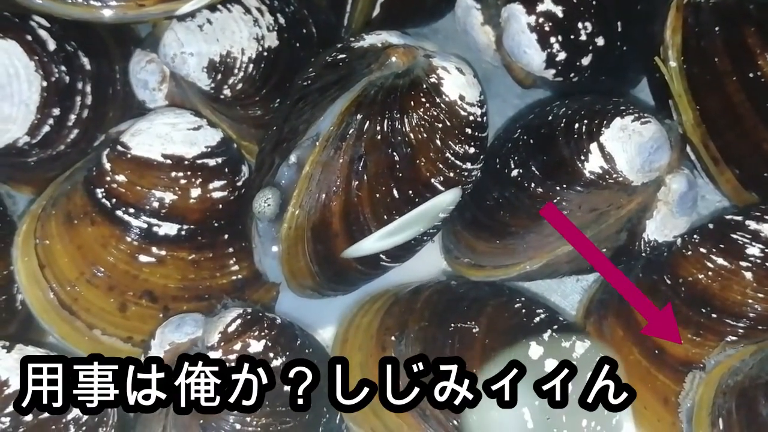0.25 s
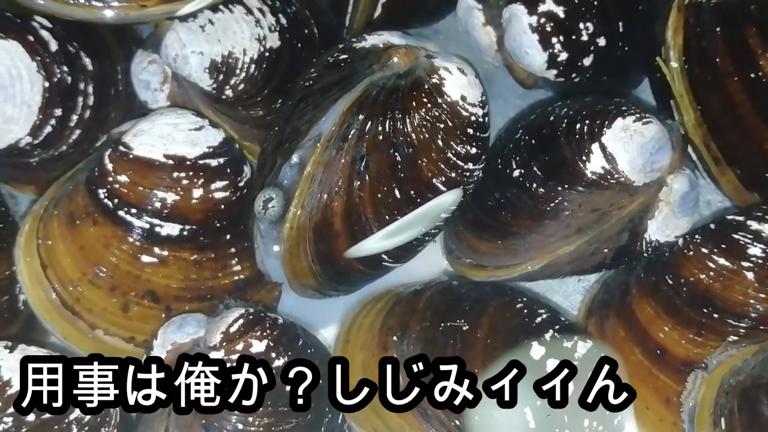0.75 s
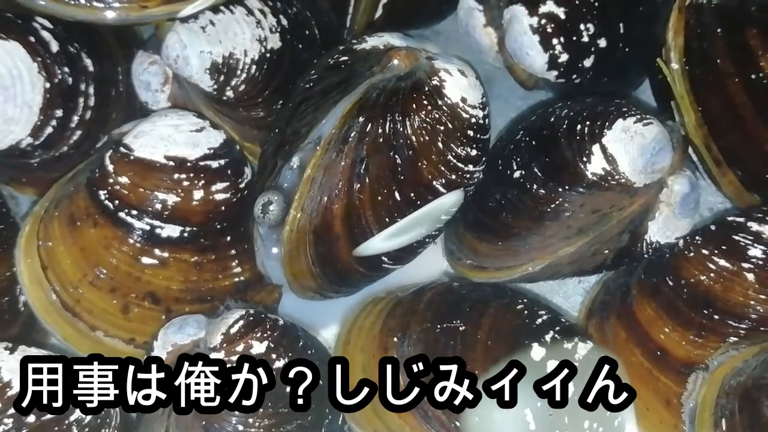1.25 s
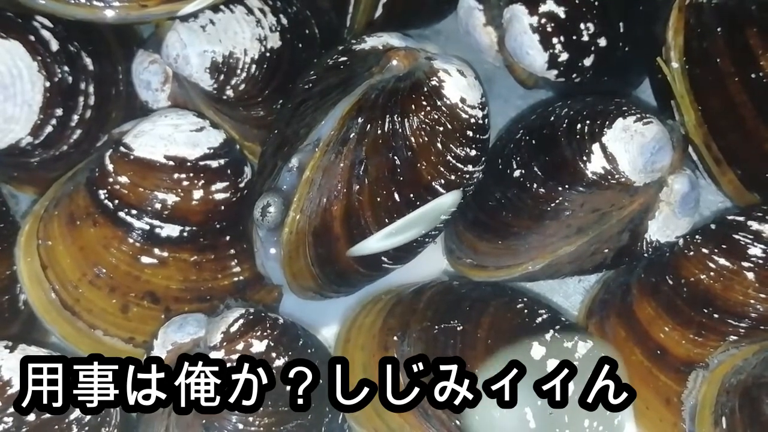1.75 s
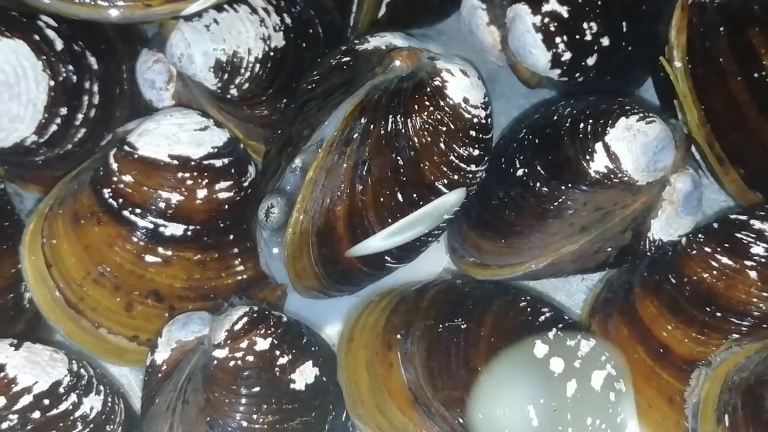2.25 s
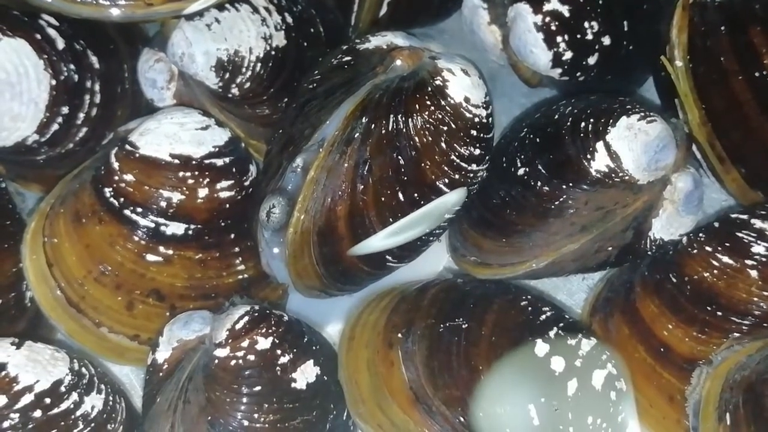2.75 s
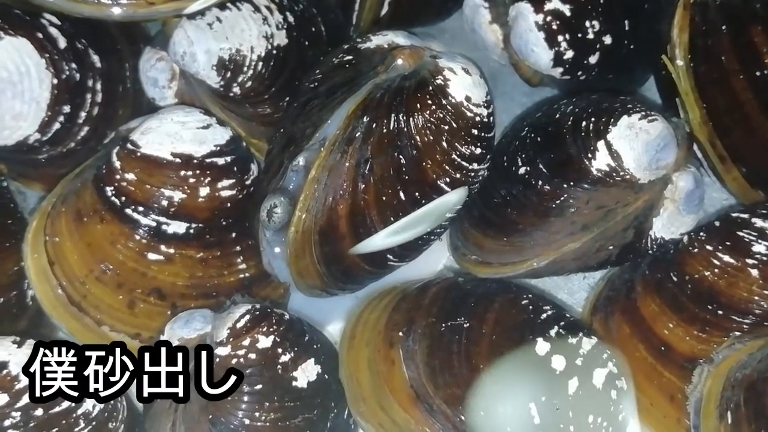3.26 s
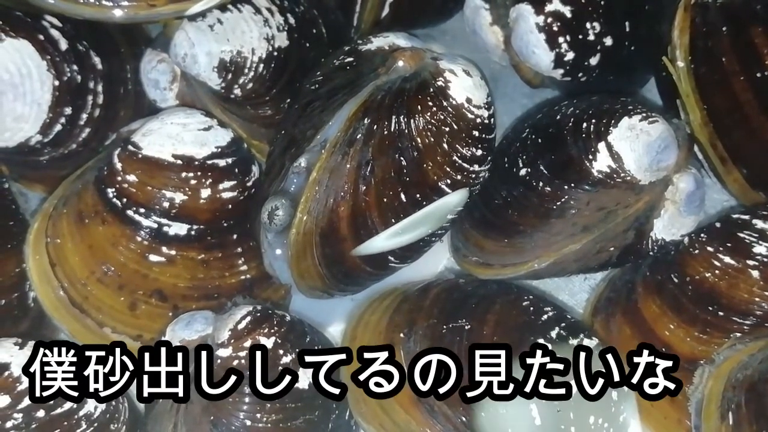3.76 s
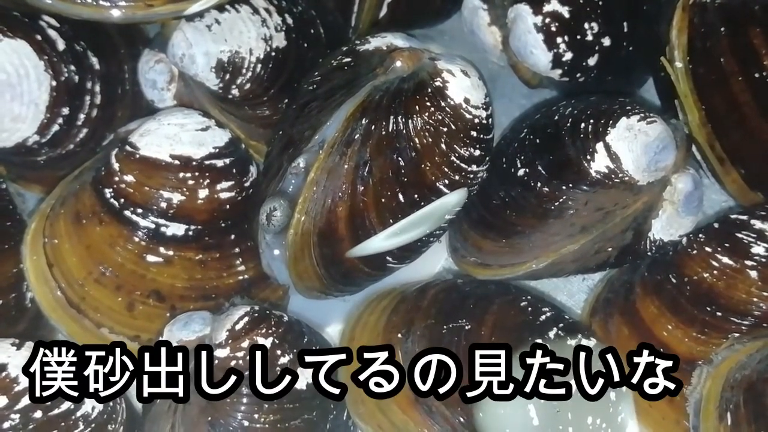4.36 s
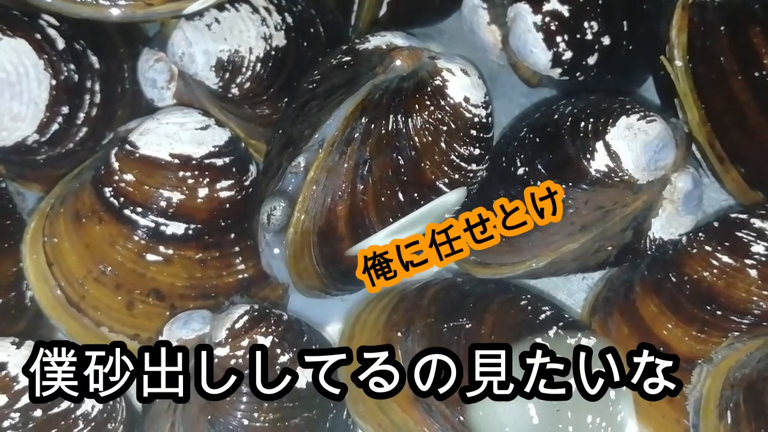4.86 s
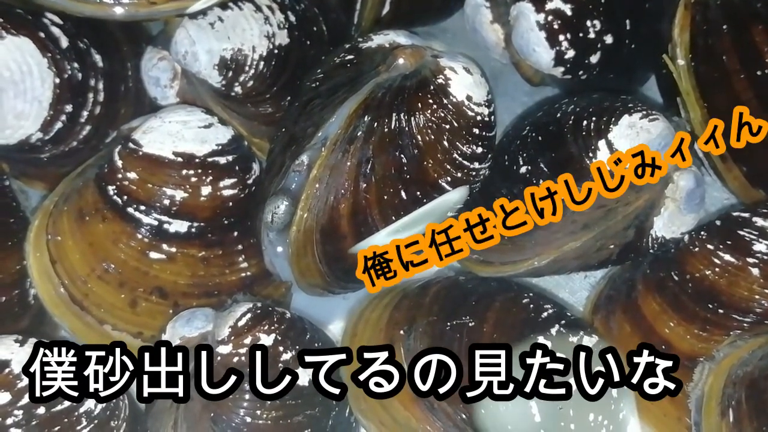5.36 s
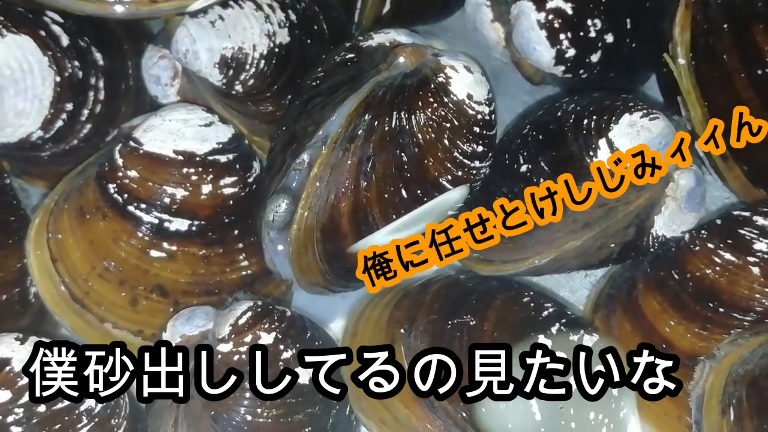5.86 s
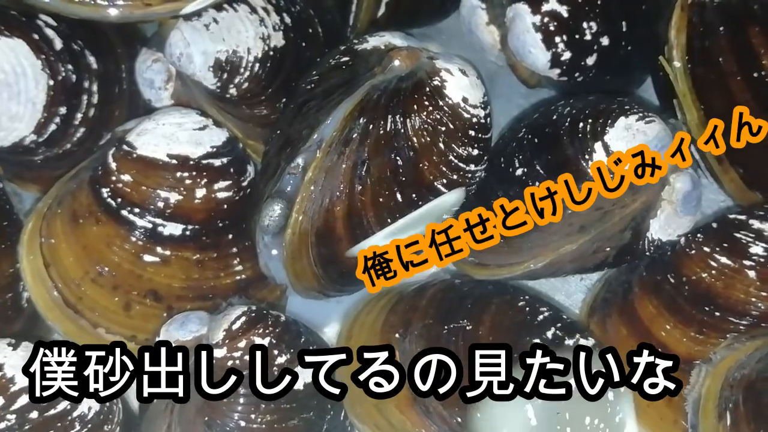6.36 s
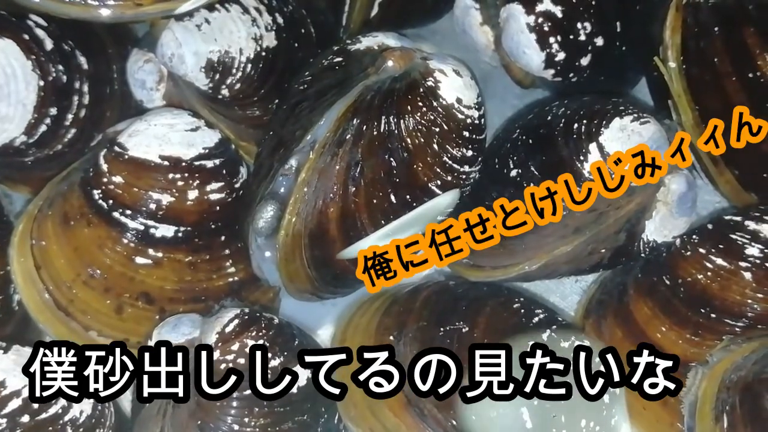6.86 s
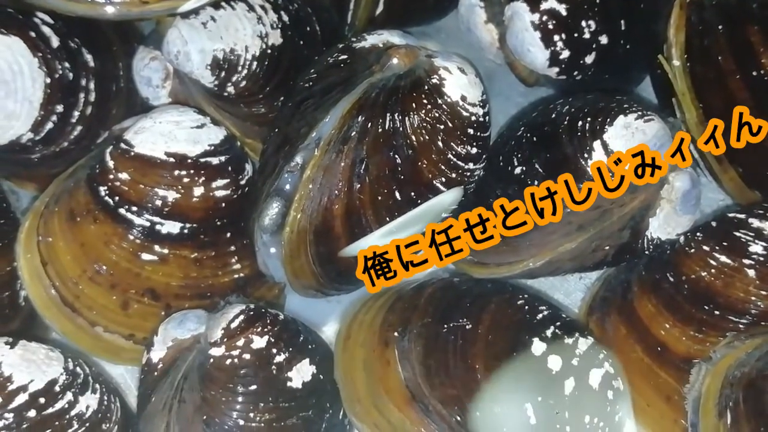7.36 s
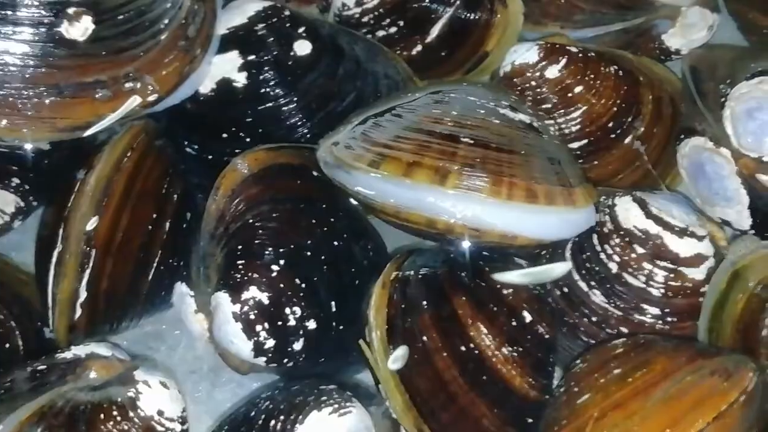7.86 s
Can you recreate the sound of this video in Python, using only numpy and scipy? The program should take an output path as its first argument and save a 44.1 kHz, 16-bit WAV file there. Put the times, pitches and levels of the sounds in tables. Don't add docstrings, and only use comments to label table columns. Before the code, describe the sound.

A small quiet room with a faint, steady low hum and soft far air; clams in a shallow tray of water are very close, in wide stereo, the brightest spray leaning right. The first 0.7 seconds are nearly still. From 0.7 to 1.6 come small clicks and brief fizzy dribbles. Between 1.7 and 2.7 ticks, bubbly blips and plops crowd together, with one hard, bright snap at 2.44 followed by a wet spurt. Isolated clicks and soft plops follow at 2.8, 3.15, 3.35, 3.6, 3.8 and 3.95, then a lull. A rounded, hollow plop lands at 4.75. From 5.0 to 6.1 a dense cluster bursts out: sharp snaps at 5.5 and 5.85, low gulps, squeaky narrow hisses, gurgling squirts. It thins to light dribbling and ticks, then swells at 7.3 to 7.5 into a bright, fizzing squirt with plops. After that, mostly hum and a faint low gulp around 8.1.

```python
import sys
import numpy as np
from scipy import signal
from scipy.fft import rfft, irfft, next_fast_len
from scipy.io import wavfile
from scipy.ndimage import uniform_filter1d, map_coordinates

SR = 44100
rng = np.random.default_rng(int(sys.argv[2]) if len(sys.argv) > 2 else 0)


def voltage_ratio(level):
    return 10 ** (np.asarray(level, float) / 20)


def transcribe(u):
    v = np.clip(np.atleast_2d(u).T, -1, 1)
    q = np.round(v * 32767).astype(np.int16)
    wavfile.write(sys.argv[1], SR, q)


N = 358136

# pitch_hz, left_minus_right_db
SIDE_LEVELS = [(250, 0), (800, -6), (1200, 2.5), (1900, 3), (2600, -1), (3300, -4.5), (5000, -6),
               (7300, -11.5), (8800, 2), (11500, -6.5), (14000, -8), (15700, -15)]
# low_hz, high_hz, scatter_t60_s, rise_s, room_t60_s, share common to both sides [0-1]
PARTS = [
    (4300, 10000, .016, .0001, .24, .3),
    (1400, 4500, .016, .0002, .27, .4),
    (10000, 19000, .014, .0001, .17, .3),
    (170, 1600, .045, .002, .3, .8),
]
LAG = 11
SPACING = 28
GULP_SPACING = 19
GULP_HZ = 800
EDGE = 1.83


def unit(x):
    return x / np.sqrt(np.mean(x ** 2) + 1e-20)


def along(points, hz):
    f, v = np.transpose(points)
    return np.interp(np.log(hz + 1), np.log(f + 1), v)


def filtered(x, response):
    m = next_fast_len(x.shape[-1] + 4096)
    spectrum = rfft(x, m) * response(np.fft.rfftfreq(m, 1 / SR))
    return irfft(spectrum, m)[..., :x.shape[-1]]


def resonance(f, hz, width_hz):
    damping = 1j * f * width_hz
    return damping / (hz * hz - f * f + damping)


def band(x, low_hz, high_hz):
    sos = signal.butter(N=3, Wn=[low_hz, high_hz], btype="band", fs=SR, output="sos")
    return signal.sosfilt(sos, x)


def patches(rate):
    knots = rng.standard_normal(int(N * rate / SR) + 4)
    return map_coordinates(knots, [np.arange(N) * rate / SR])


def rush(spectrum):
    # pitch_hz, left_minus_right_db
    balance = [(60, -0.5), (600, 2.5), (1400, -4), (2400, -3), (4400, -5), (6900, -4), (8600, 1.5),
               (15000, 0)]
    # pitch_hz, left-right coherence [0-1]
    likeness = [(60, 1), (170, 1), (260, 0.97), (345, 0.96), (480, .15), (690, 0.36), (1000, 0.44),
                (1300, 1), (1640, 0.16), (2070, .1), (3100, 0.23), (6000, 0.056)]

    def mid_side(hz):
        turn = np.arccos(np.clip(along(likeness, hz), -1, 1)) / 2
        return voltage_ratio(along(spectrum, hz)) * [np.cos(turn), np.sin(turn)]

    mid, side = filtered(rng.standard_normal((2, N)), mid_side)
    pair = np.array([mid + side, mid - side])
    return unit(filtered(pair, lambda hz: voltage_ratio(np.outer([.5, -.5], along(balance, hz)))))


def house():
    # pitch_hz, level_db per Hz
    hum_spectrum = [(15, -60), (25, -13.5), (54, -2), (118, -13), (152, -2.5), (183, -9.5), (242, -8),
                    (271, -9.5), (299, -16.5), (500, -21.5), (650, -57), (1100, -120)]
    # pitch_hz, level_db per Hz
    air_spectrum = [(300, -25), (450, -3), (650, -8), (1000, -3), (1400, .5), (2000, -4.5), (3000, -4.5),
                    (4000, -13), (5700, -15), (8800, -14), (9800, -21.5), (11000, -26), (15600, -30)]
    # pitch_hz, width_hz, level_db
    modes = [
        (48, 18, -65.5),
        (149.7, 7.6, -65.5),
        (208, 5.8, -67),
        (242.2, 17.2, -63.5),
    ]
    # pitch_hz, lag_rad
    phase_lag = [(60, .1), (260, .5), (430, .7), (600, 3.1), (860, 2.8), (1030, 5.3), (1640, 5.8),
                 (2070, 8.5), (3100, 9.5)]
    settled = np.arange(N) > 7.85 * SR
    hum = voltage_ratio(-56.5 + 0.11 * patches(5.5)) * rush(hum_spectrum)
    air = hum + voltage_ratio(-59 - 1.2 * settled + 0.48 * patches(8.8)) * rush(air_spectrum)
    for hz, width_hz, db in modes:
        mode = filtered(rng.standard_normal(N), lambda f: resonance(f, hz, width_hz) ** 2)
        air = air + voltage_ratio(db) * unit(mode)
    return filtered(air, lambda hz: np.exp(1j * np.outer([-.5, .5], along(phase_lag, hz))))


def wavering(x):
    hz, _, z = signal.stft(x, SR, nperseg=512)
    field = rng.standard_normal(z.shape[1:])
    field = uniform_filter1d(field, size=5, axis=0)
    field = uniform_filter1d(field, size=16, axis=1)
    field = unit(field) * (hz[:, None] > 400)
    waver_db = 2 * field
    return signal.istft(z * voltage_ratio(waver_db), nperseg=512)[1][:, :N]


def water_colour():
    # pitch_hz, level_db per Hz
    water_spectrum = [(140, -14), (280, -1), (500, -5), (850, -1), (1400, -5), (2900, -.5), (4000, -4),
                      (5200, -4.5), (7400, 0), (9000, -3), (10200, -13), (12900, -19), (14600, -29),
                      (15800, -38)]
    hz = np.fft.rfftfreq(2048, 1 / SR)
    db = along(water_spectrum, hz) + np.outer([.5, -.5], along(SIDE_LEVELS, hz))
    cepstrum = irfft(np.log(np.maximum(voltage_ratio(db), 1e-4)))
    cepstrum[:, 1:len(hz) - 1] *= 2
    cepstrum[:, len(hz):] = 0
    return irfft(np.exp(rfft(cepstrum)))[:, :len(hz)]


def coloured(x, colour):
    kernel = colour.reshape((1,) * (x.ndim - 2) + (2, -1))
    return signal.oaconvolve(x, kernel, axes=-1)[..., :x.shape[-1]]


def paths(share, near_t60, rise, room_t60, spacing=SPACING):
    # time_s, level_db over the tail
    walls = [
        [(.0125, 0.5), (.03, 5.5)],
        [(.012, -1), (.023, 7)],
    ]
    echo_s, cliff = 0.00094, 1.83
    t = np.arange(SR // 3) / SR
    own, right = rng.standard_normal((2, len(t)))
    left = share * np.roll(right, spacing - LAG) + np.sqrt(1 - share ** 2) * own
    pair = np.array([left, right])
    near = np.sign(pair) * voltage_ratio(-15 * (4 * t / near_t60) ** cliff) * (1 - np.exp(-t / rise))
    room = pair * voltage_ratio(-60 * t / room_t60) * (1 - np.exp(-(t / 0.0063) ** 2))
    walls_db = [sum(db * np.exp(-((t - s) / echo_s) ** 2) for s, db in side) for side in walls]
    return np.array([near, room * voltage_ratio(np.array(walls_db))])[..., :SR // 6]


def add(out, s, sound, db, start, size):
    at = round(s * SR)
    gain = voltage_ratio(db) / np.sqrt(np.mean(sound[:, start:start + size] ** 2))
    out[0, at + LAG:][:sound.shape[1]] += gain * sound[0]
    out[1, at:][:sound.shape[1]] += gain * sound[1]


def swells():
    # middle_s, half_length_s, fizz_db, bubbles_db and gurgle_db re fizz
    jets = [(0.3, 0.41, -70, 4.5, -6), (0.92, 0.13, -52, -1.5, -4.5), (1.3, 0.026, -57.5, 1, 4),
            (2.7, 0.049, -54.5, -10, -8), (6.63, 0.22, -62.5, -6.5, -9), (3.3, .15, -79, 0, 2),
            (1.72, 0.12, -49, -2, -4.5), (1.87, 0.086, -48.5, -15, 2), (2.03, 0.055, -54, 1, -10),
            (2.9, 0.15, -60.5, 3, 4), (4.58, 0.044, -67, -4, -10), (5.17, 0.051, -55, -9, -14),
            (5.27, 0.091, -49, -3, 0), (5.72, 0.095, -50, -0.5, 3.5), (6.4, 0.079, -53, -15, -16),
            (6.84, 0.084, -53, -10, -7), (6.97, 0.13, -43, -6.5, -10.5), (7.24, 0.1, -44, -16, -11.5),
            (7.355, 0.096, -34.5, -9, -15), (7.425, 0.036, -37.5, -9.5, -10), (8.03, 0.018, -67, -16, 3)]
    # middle_s, half_length_s, fizz_db, bubbles_db and gurgle_db re fizz
    dribbles = [(0.2, 0.13, -77, -6, 3), (0.8, 0.044, -51.5, -9, -2), (1.1, 0.077, -44, -7, -11),
                (1.19, 0.03, -51, 0, 3.5), (1.4, 0.046, -57.5, -4.5, -9), (1.51, 0.081, -48, -2, -6.5),
                (2.19, 0.072, -62.5, 13, 15.5), (2.51, 0.045, -39, 0, -7), (2.62, 0.049, -56.5, 14, 6),
                (3.26, 0.075, -63.5, 10, 4), (4.95, 0.061, -52.5, -5, -5), (5.5, 0.082, -49.5, 6, 3),
                (5.635, 0.055, -34.5, -2, -3), (5.81, 0.085, -46, 0.5, 8), (6.01, 0.11, -50, 2, 7),
                (6.22, 0.24, -57, -5, -5.5), (7.485, 0.048, -38.5, -6, -10)]
    seep_db = [
        -89,
        -81,
        -93,
        -66.5,
    ]
    t = np.arange(N) / SR
    power = voltage_ratio(np.array(seep_db))[:, None] ** 2
    for rows, mist_db in (jets, -9), (dribbles, -15):
        for mid, half, db, bubbles_db, gurgle_db in rows:
            swell = np.exp(-2 * np.abs((t - mid) / half) ** EDGE)
            levels_db = db + np.array([0, bubbles_db, mist_db, gurgle_db])
            power = power + np.outer(voltage_ratio(levels_db) ** 2, swell)
    return np.sqrt(power)


def spurts():
    droplet_rates = [
        3930,
        718,
        4030,
        700,
    ]
    flow, colour = patches(45), water_colour()
    out, step = np.zeros((2, N + LAG)), SR // 5
    for gain, rate, part in zip(swells(), droplet_rates, PARTS):
        low_hz, high_hz, scatter, rise, t60, share = part
        sizes = voltage_ratio(1.3 * rng.exponential(1, N)) * rng.standard_normal(N)
        drops = (rng.random(N) < rate / SR) * sizes
        drops = drops * voltage_ratio(0.54 * flow + 2.1 * patches(30))
        spacing = SPACING if low_hz > GULP_HZ else GULP_SPACING
        wet = np.zeros((2, N + SR))
        for at in range(0, N, step):
            near, room = paths(share, scatter, rise, .5 * t60, spacing)
            landing = signal.fftconvolve(drops[None, at:at + step], near + voltage_ratio(-8.0) * room, axes=1)
            wet[:, at:at + landing.shape[1]] += landing
        spray = gain * unit(band(coloured(wet[:, :N], colour), low_hz, high_hz))
        out[0, LAG:] += spray[0]
        out[1, :N] += spray[1]
    return out[:, :N]


def snaps(every):
    out, colour = np.zeros((2, N + SR)), water_colour()
    for s, db, hz, room_db, bubble_db in every:
        sizzle_db = -15 - 0.54 * bubble_db
        levels_db = db + np.array([0, bubble_db, sizzle_db])
        echoes_db = levels_db + room_db + np.array([0, 1.26, 0.5])
        for k, (low_hz, high_hz, scatter, rise, t60, share) in enumerate(PARTS[:3]):
            near, room = band(coloured(paths(share, scatter, rise, t60), colour), low_hz, high_hz)
            if k == 1:
                near = near + 4 * filtered(near, lambda f: resonance(f, hz, 450))
                room = room + 0.5 * filtered(room, lambda f: resonance(f, hz, 300))
            add(out, s, near, levels_db[k] - [.7, .7, 3][k], 0, size=160)
            add(out, s, room, echoes_db[k] - 1, 350, size=650)
    return out[:, :N]


def plops(pockets):
    out, colour = np.zeros((2, N + SR)), water_colour()
    low_hz, high_hz, scatter, rise, t60, share = PARTS[3]
    for s, db, hz, room_db in pockets:
        near, room = paths(.96 if hz < GULP_HZ else share, scatter, rise, t60, GULP_SPACING)
        first = round(rise * SR) + np.array([GULP_SPACING - LAG, 0])
        near[[0, 1], first] += 5.3
        sound = band(coloured(near + voltage_ratio(room_db) * room, colour), low_hz, high_hz)
        sound = sound + 3.2 * filtered(sound, lambda f: resonance(f, hz, .27 * hz))
        add(out, s, sound, db - 4.0, 0, size=350)
    return out[:, :N]


def throats():
    # middle_s, half_length_s, level_db, first_hz, last_hz
    hisses = [(1.2, .05, -49.5, 2720, 2800), (2.085, 0.036, -51, 1300, 1290),
              (2.845, 0.041, -56, 6860, 6800), (2.91, 0.033, -59, 5570, 5600),
              (4.995, .015, -48, 3100, 3010), (5.03, .015, -40, 3300, 3670),
              (5.625, 0.028, -38.5, 3070, 3900), (5.665, .035, -41.5, 2530, 2400),
              (5.765, .02, -43, 1146, 1150), (5.82, 0.024, -42, 1650, 1970),
              (5.865, 0.024, -38, 1850, 1860), (6.95, 0.089, -58.5, 1800, 1790),
              (7.24, 0.037, -44.5, 3020, 3040)]
    out = np.zeros((2, N + SR))
    for mid, half, db, first_hz, last_hz in hisses:
        t = np.arange(-1.5 * half, 1.5 * half, 1 / SR)
        hz = first_hz + (last_hz - first_hz) * (t / half + 1) / 2
        width_hz = .12 * first_hz
        knots = rng.standard_normal((4, 200))
        slow = [map_coordinates(k, [(t - t[0]) * width_hz]) for k in knots]
        turn = 2 * np.pi * np.cumsum(hz) / SR
        hiss = unit(np.array(slow[:2]) * np.cos(turn) + np.array(slow[2:]) * np.sin(turn))
        sides = voltage_ratio(along(SIDE_LEVELS, first_hz) * np.array([[.5], [-.5]]))
        hiss = hiss * sides * np.exp(-np.abs(t / half) ** EDGE)
        out[:, round((mid + t[0]) * SR):][:, :len(t)] += voltage_ratio(db) * hiss
    return out[:, :N]


def scene():
    # start_s, crack_db, bubble_hz, room_db re direct, bubble_db re crack
    loud_snaps = [(0.7443, -47.5, 2210, -3, -8), (0.8147, -38, 3630, -2.5, -5.5),
                  (1.1463, -37.5, 2730, 1, -2.5), (1.7727, -39, 3280, -1.5, -10),
                  (1.8307, -31.5, 3400, -9, -2.5), (2.2579, -33.5, 2370, -10.5, -9),
                  (2.3637, -39.5, 2750, -7, -6), (2.4424, -14.5, 3270, -14.5, -7),
                  (2.5643, -36, 2420, -4.5, -5), (2.8216, -41, 1900, -5.5, 0),
                  (3.351, -38, 1770, -4.5, -6.5), (3.605, -31.5, 3200, -4, -8),
                  (3.9565, -28.5, 2200, -9, -9), (5.0176, -26.5, 2890, -5.5, -5.5),
                  (5.209, -44.5, 3560, 5, -4.5), (5.42, -33, 3320, -9.5, -4.5),
                  (5.4583, -33.5, 2360, -1, -5), (5.5074, -19.5, 2690, -10.5, -9.5),
                  (5.6314, -25, 2310, -11, -11), (5.748, -36.5, 3500, -0.5, -6),
                  (5.8005, -23.5, 1730, -11.5, -9), (5.8471, -18, 1700, -10, -8),
                  (5.9435, -23.5, 2740, -10, -6.5), (7.4567, -27, 3130, -14.5, -27)]
    # start_s, crack_db, bubble_hz, room_db re direct
    ticks = [(1.0419, -46, 2170, -9), (1.1759, -36.5, 3090, -5.5), (1.199, -37, 4170, -9),
             (1.5478, -40.5, 2780, -24), (1.754, -52.5, 2760, 5), (2.0366, -47, 2680, -18),
             (2.1312, -47, 4340, -3), (2.1497, -41, 1790, -7.5), (2.232, -42, 2770, -11),
             (2.3958, -43, 3200, -10), (2.4196, -44, 2470, -2.5), (2.5154, -33, 2760, -13),
             (2.588, -33.5, 3270, -19), (2.694, -49, 2430, -7.5), (3.085, -50, 2290, -9),
             (3.833, -55, 1810, 0), (4.9237, -49, 2200, -14), (4.9634, -43, 2300, -7),
             (6.0161, -33, 1800, -11.5), (6.1435, -43.5, 2010, -22), (6.2024, -45.5, 2940, -11),
             (6.3158, -46.5, 1940, -3), (6.7818, -43, 2580, -2), (7.3402, -31, 3380, 1),
             (.873, -47, 3000, -12), (1.522, -47, 2200, -9), (5.0137, -40, 2900, -20),
              (5.0277, -33.5, 3400, -13), (5.4655, -38, 2000, -13), (5.614, -32, 1900, -10),
              (5.638, -33, 3500, -12), (5.7537, -42, 1600, -13), (5.823, -37, 3500, -21),
              (5.8448, -35, 1900, -20), (5.941, -38, 2700, -20), (6.0007, -44, 1870, -3),
              (6.124, -52, 4400, -14), (6.838, -49, 3000, -16), (7.3233, -38, 3000, -12),
              (7.357, -29.5, 2000, -12), (7.381, -43, 2400, -14)]
    # start_s, crack_db, bubble_hz, room_db re direct
    blips = [(1.4477, -43, 3250, -13), (1.5193, -51, 2480, -9), (1.6627, -46.5, 3450, -4),
             (1.808, -44.5, 2780, -7), (1.893, -47, 3270, -3.5), (1.9493, -43.5, 2870, -7.5),
             (2.001, -53, 2420, -4.5), (2.028, -50, 2650, 2), (2.0679, -44.5, 3160, -8.5),
             (3.156, -53, 3860, -4), (4.7459, -47.5, 4700, -7), (4.9826, -47.5, 3260, -6.5),
             (5.326, -42.5, 2400, -12.5), (5.348, -42, 3020, -13), (5.828, -38, 1900, -7),
             (7.1428, -41, 2950, -10.5), (7.2066, -32, 2900, -13.5)]
    # start_s, peak_db, pitch_hz, room_db
    pockets = [(0.813, -48, 934, -2), (1.447, -41, 1230, -8), (1.89, -40, 1110, -5), (1.963, -39, 870, -16),
               (2.024, -42.5, 1070, -5), (2.07, -43, 1240, -11), (2.148, -44, 1070, -4),
               (2.259, -40.5, 991, -25), (2.302, -35, 960, -10), (2.362, -40.5, 1080, -9),
               (2.441, -33.5, 1080, -6.5), (2.497, -41, 970, -10), (2.577, -34.5, 714, -8),
               (2.824, -40.5, 1080, -4), (3.087, -46.5, 900, -27), (3.157, -37, 915, -9),
               (3.605, -42.5, 690, -9), (3.832, -38.5, 850, -6), (4.7485, -26, 685, -18),
               (5.348, -41, 1140, -7.5), (5.507, -32.5, 960, -15), (5.745, -33.5, 1080, -22),
               (5.847, -28, 1470, -11.5), (5.943, -30.5, 1070, -9), (6.002, -34, 1040, -4),
               (6.067, -36, 900, -6), (6.663, -47.5, 950, -16), (6.797, -38, 755, -12.5),
               (7.142, -42.5, 1030, -10), (7.344, -29, 1030, -12)]
    # start_s, peak_db, pitch_hz, room_db
    gulps = [(1.751, -44.5, 360, -12), (1.832, -37.5, 364, -23), (2.187, -38.5, 368, -14),
             (2.285, -43, 387, -11), (2.396, -44, 330, 0.5), (2.59, -31.5, 400, -18),
             (3.351, -34.5, 530, -12.5), (4.764, -32.5, 340, -7), (5.02, -40.5, 427, -5),
             (5.207, -41, 257, 0), (5.458, -38, 357, -8), (5.472, -44, 412, -21), (5.47, -37.5, 247, 1),
             (5.561, -33.5, 380, -6), (5.594, -37.5, 317, -6), (5.799, -32, 380, -17),
             (7.319, -45.5, 520, 3), (7.345, -34.5, 280, -8), (8.105, -49.5, 201, -5),
             (5.962, -37, 1120, -5)]
    # start_s, peak_db, pitch_hz, room_db
    blobs = [(.873, -42.5, 1040, -9), (1.829, -42, 1100, -23), (2.563, -42, 640, -8),
             (4.753, -27, 660, -9.5), (4.75, -32.5, 980, -6), (4.752, -36, 1400, 1), (3.822, -45, 600, -10),
             (1.15, -49, 700, -4), (6.316, -49.5, 800, -6), (5.5, -40.5, 840, -9), (5.22, -42, 1010, -18),
             (5.234, -40, 640, -16), (5.325, -42, 1200, -14), (5.612, -39, 1040, -8),
             (5.625, -38, 1050, -14), (6.143, -45, 1030, -19), (7.35, -29, 980, -11), (2.5, -50, 1000, -16),
             (3.3525, -37, 520, -10), (3.158, -44, 450, -12)]
    tick_bubble_db, blip_bubble_db = -4, 5.5
    air = wavering(house())
    small = [(*row, tick_bubble_db) for row in ticks]
    dull = [(*row, blip_bubble_db) for row in blips]
    shells = snaps(loud_snaps + small + dull)
    return air + spurts() + shells + plops(pockets + gulps + blobs) + throats()


def band_limit(x):
    return signal.sosfilt(signal.butter(12, 16520, fs=SR, output="sos"), x)


def record(dry):
    top_hz = 15830
    mix = filtered(dry, lambda hz: hz < top_hz)
    return band_limit(mix)


dry = scene()
out = record(dry)
transcribe(out)
```